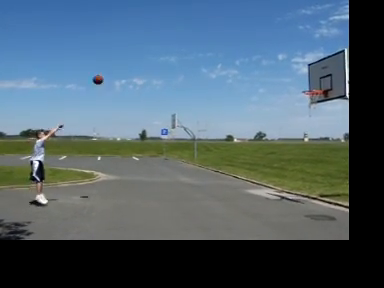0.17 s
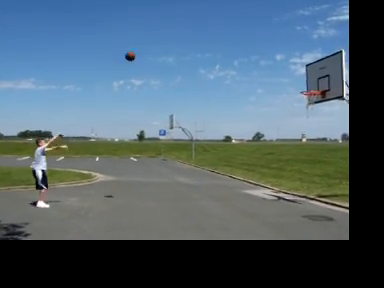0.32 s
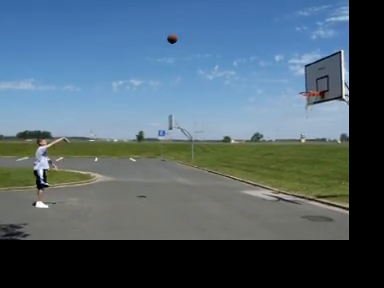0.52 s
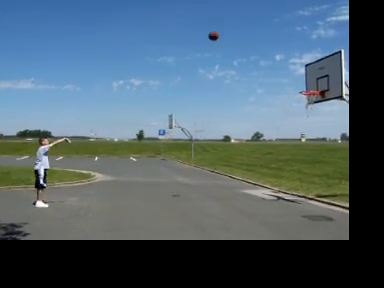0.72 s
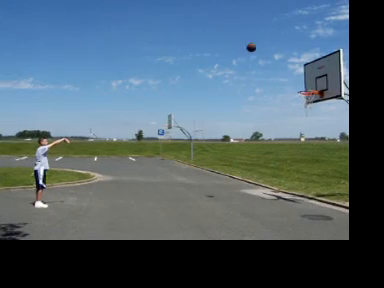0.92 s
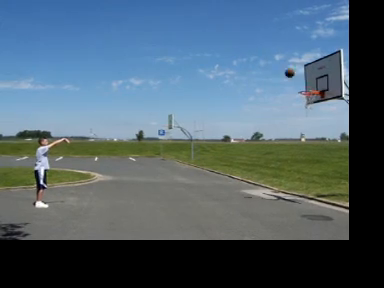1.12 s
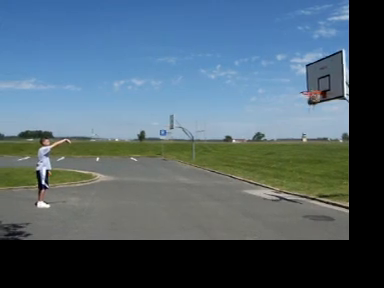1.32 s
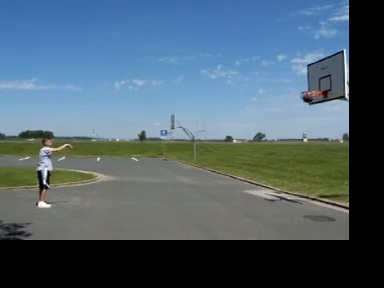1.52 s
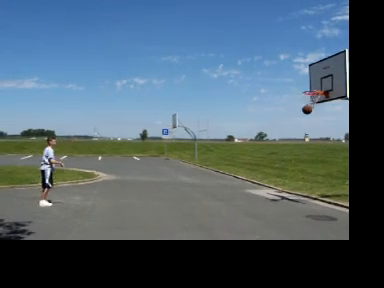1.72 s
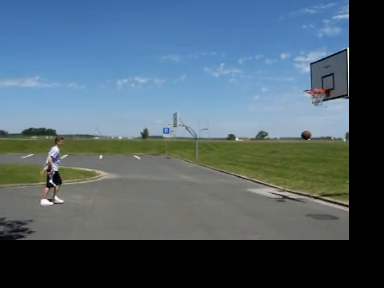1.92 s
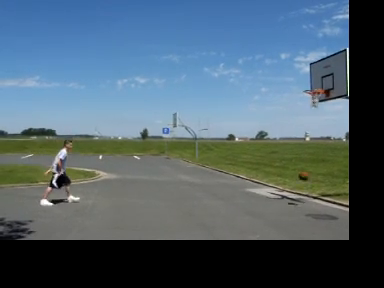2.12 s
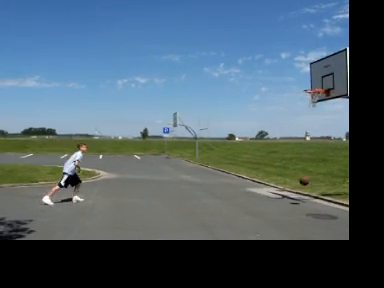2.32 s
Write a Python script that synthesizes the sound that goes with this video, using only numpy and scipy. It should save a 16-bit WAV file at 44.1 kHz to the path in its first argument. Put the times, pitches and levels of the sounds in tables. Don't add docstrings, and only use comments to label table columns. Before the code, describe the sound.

A basketball hits a metal hoop on a quiet outdoor court. Faint breeze, distant traffic and hiss run beneath. Shoes land with soft clustered thuds at 0.3 seconds. At 1.3 the rim clangs, knocks again and its loose bracket rattles briefly, while board and pole hum on. Net cords scrape softly from 1.5 to 2. At 2.3 the ball slaps asphalt loudly, with quick echoes.

```python
import sys
import numpy as np
from scipy import signal
from scipy.fft import rfft, irfft
from scipy.io import wavfile
from scipy.ndimage import uniform_filter1d

SR = 44100
rng = np.random.default_rng(int(sys.argv[2]) if len(sys.argv) > 2 else 0)


def magnitude_from_level(level_db):
    exponent = np.asarray(level_db, float) / 20
    return 10 ** exponent


def dump_mix(stems):
    frames = np.atleast_2d(stems).T
    limited = np.clip(frames, -1, 1)
    pcm = np.round(limited * 32767).astype(np.int16)
    wavfile.write(sys.argv[1], SR, pcm)


N = 104781
T = np.arange(N) / SR

# freq_hz, density_db
AIR_SPECTRUM = [(15, -48), (28, -2), (140, -2.5), (400, -8), (1000, -14.5), (2500, -11.5), (5010, -11.5),
                (7060, -20.5), (8800, -44), (11400, -85)]
# freq_hz, gain_db
TREBLE_LOSS = [(6000, -1), (7500, -11.5), (8800, -31.5), (11000, -54.5)]
# start_s, level_db, rise_s, fall_t60_s
BRUSHES = [(1.499, -42.5, 0.016, 1), (1.546, -36, 0.0072, 0.47), (1.572, -45, .006, 0.71),
           (1.606, -39.5, 0.0091, 0.62), (1.628, -35, 0.0026, 0.29), (1.687, -37.5, 0.0038, 0.35),
           (1.72, -44.5, 0.0046, 0.55), (1.79, -46.5, 0.0047, 0.97), (1.951, -34.5, 0.005, 0.36),
           (2.0, -46.5, 0.018, 1), (0.073, -42.5, 0.0039, 0.12)]
# freq_hz, density_db
CORD_SPECTRUM = [(800, -27), (1600, -3), (2800, -4), (3600, -2.5), (4600, -7), (5800, -9), (7400, -11),
                 (8800, -34), (11400, -78.5)]
# freq_hz, width_hz, level_db
CORD_MODES = [(2780, 200, 2), (4580, 980, 2), (7220, 700, -6)]
# start_s, level_db, thud_hz, grit_db
SOLES = [
    (0.3101, -28.5, 500, -4.5),
    (0.3155, -26.5, 460, -6),
    (.329, -28.5, 340, -10),
    (0.3392, -45, 400, 2),
    (.346, -29, 750, -8),
    (.361, -41, 615, 1),
]
# freq_hz, level_db, t60_s, start_s
BOARD_MODES = [(99.8, -15.5, 0.21, 1.304), (239.2, -26, .8, 1.303), (422, -21, 0.096, 1.345),
               (345, -20, 0.045, 1.303), (555, -23, 0.043, 1.303), (335, -34.5, 0.65, 1.32),
               (48.43, -33.5, 2.2, 1.31), (102, -39.5, 3.8, 1.2), (147.5, -36.5, 1.95, 1.55),
               (197, -37.5, 1.74, 1.7), (242.5, -38.5, 2.43, 1.65), (300.5, -40, 1.63, 1.45),
               (399.5, -41.5, 3.44, 1.74), (652, -45, 3.7, 1.3)]
# freq_hz, density_db
SHUDDER_SPECTRUM = [(18, -39.5), (35, -13.5), (92, 0), (180, -4), (300, -5), (420, -7), (735, -12),
                    (3000, -35.5), (6600, -85.5)]
# start_s, level_db, contact_s, tilt_db_per_octave
KNOCKS = [
    (1.298, -16, 0.0045, 1),
    (1.308, -28, 0.017, -1),
    (1.387, -24.5, 0.0041, -2.5),
    (1.409, -48, 0.015, -10),
    (1.472, -35.5, 0.0062, -10),
    (1.537, -35.5, 0.007, -15),
]
# freq_hz, width_hz, level_db
HOOP_MODES = [(1510, 430, 1.5), (2080, 200, -4), (2500, 230, 1.5), (3500, 170, -15), (3840, 300, -7),
              (4700, 400, -10), (6400, 460, -22)]
# freq_hz, width_hz, level_db
BRACKET_MODES = [(1265, 190, -5.5), (1740, 25, -7.5), (2130, 31, -9), (2490, 160, -3), (3320, 71, -8),
                 (3740, 9, -10.5), (3920, 78, -31), (4100, 32, -14.5), (5000, 89, -31), (5180, 52, -7.5)]
# freq_hz, density_db
CLATTER_SPECTRUM = [(180, -51), (300, -23), (421, 2.5), (878, -6), (1320, -4.5), (2430, 0), (6920, -15),
                    (8800, -36), (11400, -60), (19400, -120)]
# freq_hz, density_db
SETTLE_SPECTRUM = [(400, -15), (750, 7), (1200, 8), (2000, -14), (4000, -7), (8000, -19), (9500, -63)]
# freq_hz, level_db, t60_s
BALL_MODES = [(139, -2.5, 0.17), (262, -6, 0.14), (502, -25, 0.075), (625, -19, .05), (786, -17.5, 0.062),
              (1042, -12, 0.05), (1274, -1.5, 0.017), (1800, -9, 0.02), (2070, 1, 0.015), (2404, 2, 0.01),
              (3060, -5, 0.021), (3590, 0, 0.01), (5410, -14.5, 0.029), (6670, -11, 0.012)]
# delay_s, level_db, lowest_hz, highest_hz
ECHOES = [
    (0.0286, -12, 514, 3300),
    (0.0445, -11.5, 50, 3800),
    (0.059, -21.5, 200, 2500),
]


def evened(x):
    return x / np.sqrt(np.mean(x ** 2) + 1e-20)


def noise():
    return rng.standard_normal(N)


def colour(x, points):
    hz = np.fft.rfftfreq(len(x), 1 / SR)
    f, db = np.transpose(points)
    gain = magnitude_from_level(np.interp(np.log(hz + 1), np.log(f + 1), db))
    return irfft(rfft(x) * gain, len(x))


def band(x, lo_hz, hi_hz, order=2):
    corners = [max(lo_hz, 10), min(hi_hz, 15000)]
    return signal.sosfilt(signal.butter(order, corners, "band", fs=SR, output="sos"), x)


def resonate(x, hz, width_hz):
    r = np.exp(-np.pi * width_hz / SR)
    return 2 * signal.lfilter([1 - r], [1, -r * np.exp(2j * np.pi * hz / SR)], x).real


def body(x, modes, tilt_db=0):
    out = np.zeros(len(x))
    for k, (hz, width_hz, db) in enumerate(modes):
        gain = magnitude_from_level(db + tilt_db * np.log2(hz / 1500))
        out += (-1) ** k * gain * resonate(x, hz, max(width_hz, 45))
    return out


def fade(start_s, rise_s, t60_s):
    u = np.maximum(T - start_s, 0)
    return np.minimum(u / rise_s, 1) * magnitude_from_level(-60 * np.maximum(u - rise_s, 0) / t60_s)


def clicks(per_s, spread_db):
    size = magnitude_from_level(spread_db * np.minimum(rng.exponential(1, N), 4))
    return evened(noise() * size * (rng.random(N) < per_s / SR))


def air():
    return magnitude_from_level(-42) * evened(colour(noise(), AIR_SPECTRUM))


def net():
    rub = clicks(per_s=1300, spread_db=2.5) + 1.45 * noise()
    loops = evened(body(body(rub, CORD_MODES), CORD_MODES))
    scrape = evened(colour(rub, CORD_SPECTRUM)) + magnitude_from_level(-10.5) * loops
    fray = magnitude_from_level(-43) * evened(colour(band(rub[::-1], 6800, 8600), TREBLE_LOSS))
    flutter = magnitude_from_level(1.13 * evened(uniform_filter1d(noise(), size=300)))

    def strokes(t60_scale):
        return np.sqrt(sum((magnitude_from_level(db) * fade(s, rise_s, t60_s * t60_scale)) ** 2
                           for s, db, rise_s, t60_s in BRUSHES))

    knot = evened(colour(band(noise(), 2900, 7500), TREBLE_LOSS))
    tick = magnitude_from_level(-28.5) * fade(2.2045, 0.00017, 0.0032) * knot
    return tick + flutter * (scrape * strokes(1) + fray * strokes(0.4))


def soles():
    landing_s = SOLES[0][0]
    grit = evened(band(noise(), 1500, 4900, order=1))
    scuff = magnitude_from_level(-34.5) * fade(landing_s, 0.0025, 0.13) * evened(band(noise(), 107, 830))
    drag = magnitude_from_level(-43) * fade(landing_s, 0.0022, 0.3) * colour(grit[::-1], TREBLE_LOSS)
    steps = np.zeros(N)
    for s, db, hz, grit_db in SOLES:
        thud = np.cos(2 * np.pi * hz * (T - s))
        scrape = magnitude_from_level(grit_db + 7.5) * grit * fade(s, 0.0001, 0.02)
        steps += magnitude_from_level(db) * fade(s, 0.00061, 0.02) * (thud + scrape)
    return scuff + drag + colour(steps, TREBLE_LOSS)


def yard(x):
    half_s = SR // 2
    tail = rng.standard_normal(half_s) * fade(0.0098, 0.023, 0.34)[:half_s]
    scattered = signal.fftconvolve(x, tail / np.linalg.norm(tail))[:N]
    return magnitude_from_level(-10.5) * band(scattered, 300, 3500, order=1)


def board():
    out = np.zeros(N)
    for hz, db, t60_s, s in BOARD_MODES:
        drift = uniform_filter1d(uniform_filter1d(noise(), size=1500), size=1500)
        waver = 1 + 0.15 * evened(drift)
        rise_s = 0.004 * (1 + 3 * t60_s ** 2)
        out += magnitude_from_level(db) * fade(s, rise_s, t60_s) * waver * np.sin(2 * np.pi * hz * (T - s))
    sway = magnitude_from_level(-14) * fade(1.52, 0.075, 5.2)
    shape = fade(1.304, 0.031, 0.77) + sway
    return out + magnitude_from_level(-25) * shape * evened(colour(noise(), SHUDDER_SPECTRUM))


def hoop():
    strikes, force = np.zeros(N), noise()
    scale = 1 / np.std(body(force, HOOP_MODES))
    crack = evened(band(noise(), 600, 4100, order=1))
    for s, db, contact_s, tilt_db in KNOCKS:
        release = magnitude_from_level(-40 * np.maximum(T - s - contact_s, 0) / 0.0095)
        touch = np.clip((T - s) / 0.0018, 0, 1) * release
        ring = scale * body(force * touch, HOOP_MODES, tilt_db)
        strikes += magnitude_from_level(db) * (ring + magnitude_from_level(-4.5 + 2 * tilt_db) * touch * crack)

    rattle_s, rise_s, fall_s = 1.35, 0.035, 0.016
    swell = np.exp(-((T - rattle_s) / np.where(T < rattle_s, rise_s, fall_s)) ** 4)
    taps = clicks(per_s=4000, spread_db=1.5) + 0.7 * force
    chatter = body(taps * swell, BRACKET_MODES) / np.std(body(taps, BRACKET_MODES))
    clatter = magnitude_from_level(-0.5) * swell * evened(colour(taps, CLATTER_SPECTRUM))
    settle = magnitude_from_level(-8.5) * fade(1.34, 0.042, 0.42) * evened(colour(taps[::-1], SETTLE_SPECTRUM))
    return colour(strikes, TREBLE_LOSS) + magnitude_from_level(-24) * (chatter + clatter + settle)


def bounce():
    bounce_s, contact_s, lift_t60_s = 2.2857, 0.011, 0.0089
    u = T - bounce_s
    touching = magnitude_from_level(-60 * np.maximum(u - contact_s, 0) / lift_t60_s)
    hit = np.zeros(N)
    for hz, db, t60_s in BALL_MODES:
        if hz >= 1200:
            t60_s = min(t60_s, 0.022)
        squashed = hz < 300
        turn = 0.082 if squashed else -1 / 4
        shape = fade(bounce_s, 0.00025, t60_s) * (touching if squashed else 1)
        hit += magnitude_from_level(db) * shape * np.cos(2 * np.pi * (hz * u + turn))
    slap = evened(band(noise(), 720, 3300, order=1))
    hit += magnitude_from_level(-8.5) * fade(bounce_s, 0.0004, 0.055) * slap
    back = np.zeros(N)
    for delay_s, db, lo_hz, hi_hz in ECHOES:
        back += magnitude_from_level(db) * band(np.interp(T - delay_s, T, hit), lo_hz, hi_hz)
    return magnitude_from_level(-2) * colour(hit + back, TREBLE_LOSS)


def scene():
    hits = soles() + hoop() + bounce()
    return (hits + yard(hits) + air() + board() + net())[None]


def band_limit(x):
    return signal.sosfilt(signal.butter(12, 8980, fs=SR, output="sos"), x)


def record(dry):
    dry = signal.sosfilt(signal.butter(1, 25, "high", fs=SR, output="sos"), dry)
    ceiling, edge_hz = 0.74, 8800
    held = dry / (1 + (dry / ceiling) ** 6) ** (1 / 6)
    lowpass = signal.firwin(301, edge_hz, window=("kaiser", 9), fs=SR)
    limited = signal.oaconvolve(held, lowpass[None], "same")
    return band_limit(limited)


dry = scene()
out = record(dry)
dump_mix(out)
```